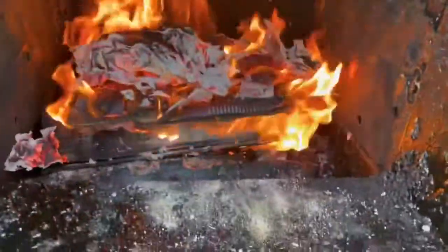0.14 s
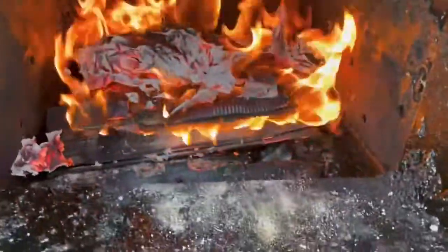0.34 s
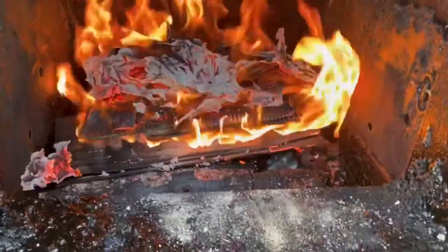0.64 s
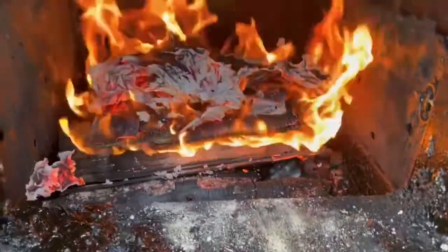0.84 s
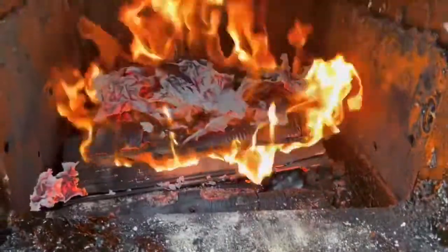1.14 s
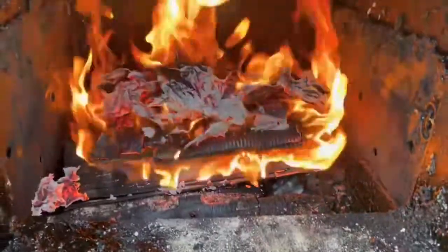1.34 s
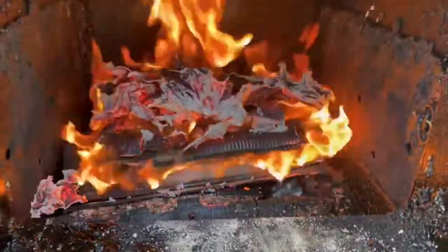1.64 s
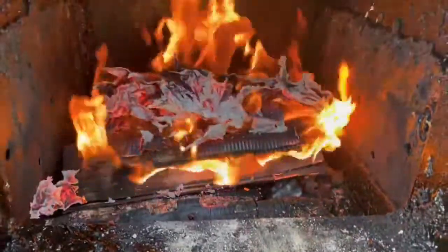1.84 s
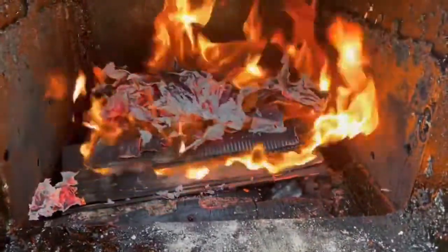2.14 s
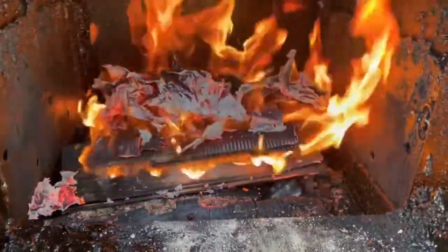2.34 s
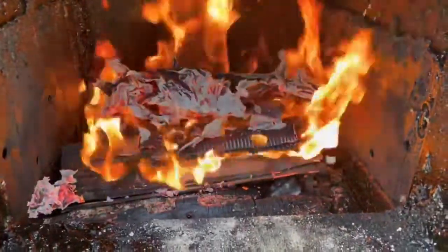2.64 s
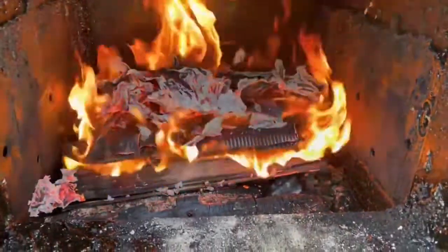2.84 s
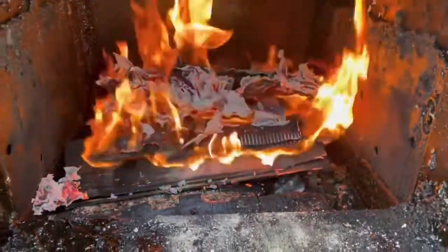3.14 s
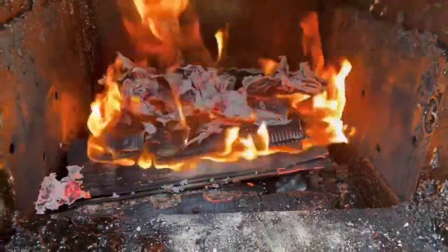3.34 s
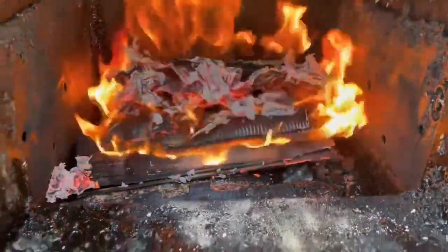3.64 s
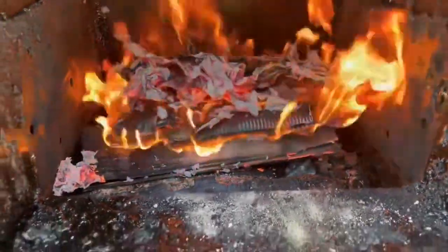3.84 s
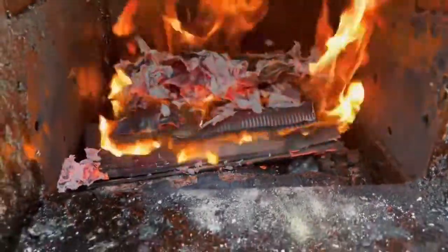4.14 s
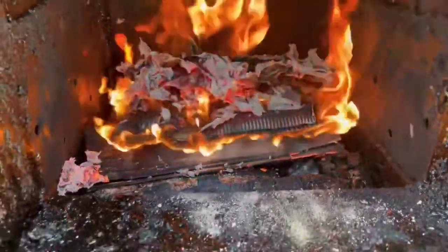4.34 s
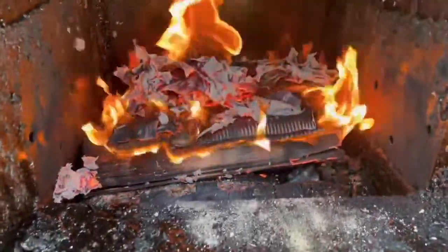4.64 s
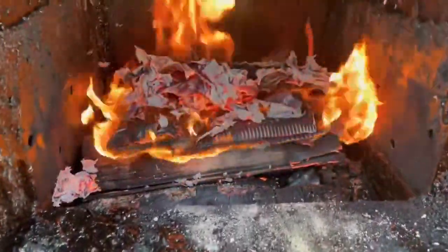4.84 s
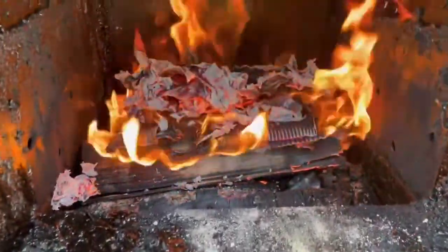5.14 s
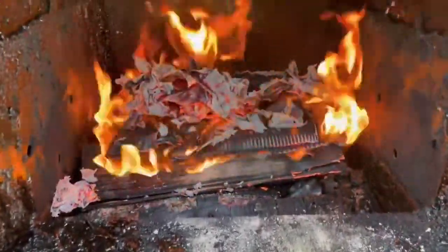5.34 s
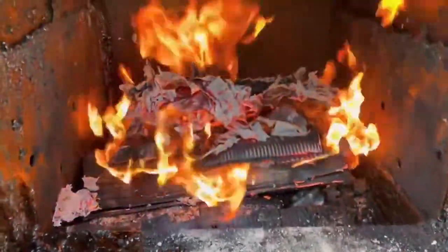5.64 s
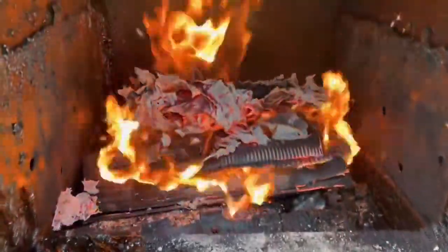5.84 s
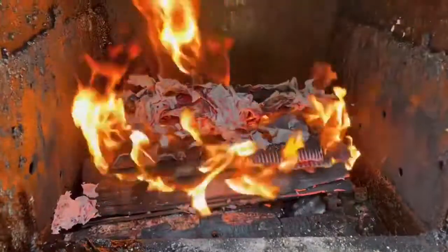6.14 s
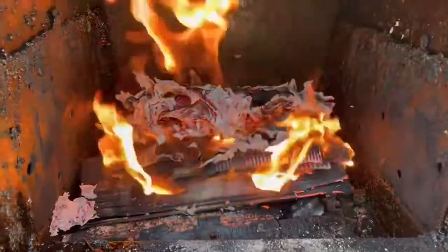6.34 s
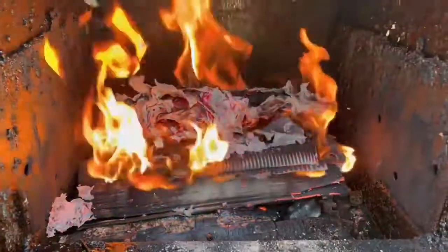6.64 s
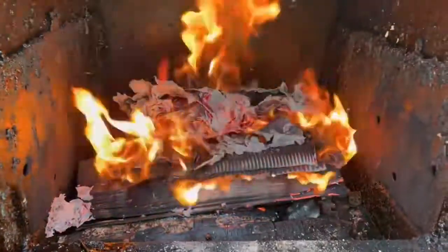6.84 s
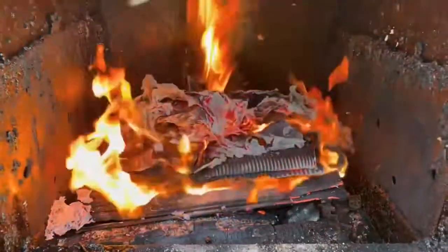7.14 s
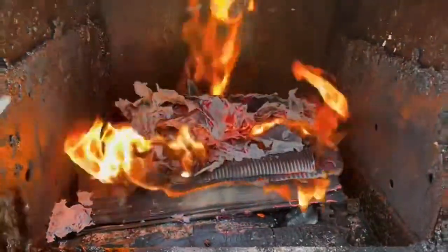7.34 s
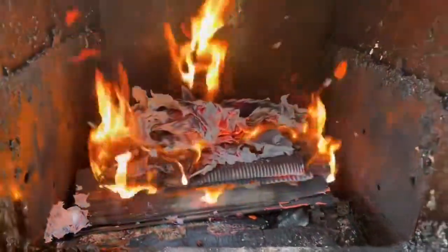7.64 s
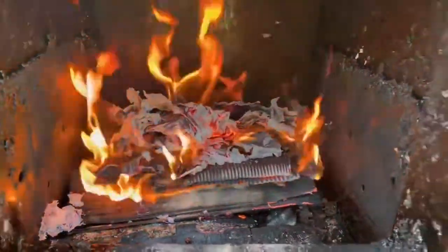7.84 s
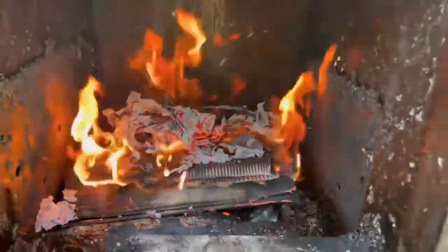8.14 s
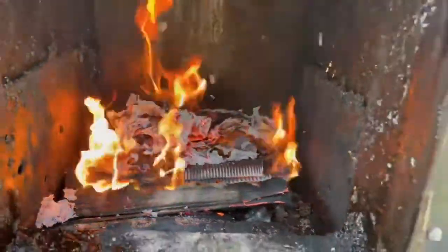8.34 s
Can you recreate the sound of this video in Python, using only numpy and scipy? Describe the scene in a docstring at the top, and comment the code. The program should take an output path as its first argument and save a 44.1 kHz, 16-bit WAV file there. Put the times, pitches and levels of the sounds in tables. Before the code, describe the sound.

A deep, steady furnace hum and low booming flames, with faint hiss, sparse dry ember ticks and cracks, and a small piece of char dropping near the end.

```python
"""Wood furnace fire

A blower motor hums as wavering sines; flames boom, roar and hiss as noise shaped by firebox air modes.
Embers tick and crack, a bit of char drops and tumbles (short decaying noise bursts), gas squeaks once;
a far cricket trills in tone pulses. Left and right differ in phase and level by frequency."""
import sys
import numpy as np
from scipy import signal
from scipy.fft import rfft, irfft, next_fast_len
from scipy.io import wavfile
from scipy.ndimage import uniform_filter1d, map_coordinates

SR = 44100
rng = np.random.default_rng(int(sys.argv[2]) if len(sys.argv) > 2 else 0)


def wav_record(signal):
    """Record a signal, one row per channel, as 16-bit PCM in the file named by sys.argv[1]."""
    frames = np.transpose(np.atleast_2d(signal))
    bounded = np.clip(frames, -1, 1)
    # unit amplitude maps onto the largest positive 16-bit level
    quanta = np.round(bounded * 32767).astype(np.int16)
    wavfile.write(sys.argv[1], SR, quanta)


N = 373968

# Left-right correlation of the noise: f/Hz, correlation/1
STEREO_ALIKE = [(60, .999), (220, .97), (330, .92), (900, .62), (1800, .35), (2700, .7), (3400, .45),
                (4500, .55), (6200, .15), (7400, .75), (7800, .99), (8800, .98), (9600, .6), (10300, .7),
                (10700, .99), (11800, .99), (12700, .5), (13500, .8), (14200, .99), (15200, .98),
                (15700, .75)]
# Stereo phase by frequency, left minus right: f/Hz, phase/rad
STEREO_PHASE = [(60, -.18), (220, -.12), (400, 0), (1200, .1), (1800, -1.2), (2300, -.1), (5000, -.4),
                (6400, 3.0), (8800, 3.2), (10400, 6.25), (12300, 6.35), (13400, 9.2), (15500, 9.5)]
# Stereo level by frequency, left minus right: f/Hz, level/dB
STEREO_LEAN = [(60, -1), (200, -1), (380, -3.5), (700, -2), (1900, -5), (3000, -2), (5000, -5),
               (6800, -0.5), (15000, 1)]
TOP_HZ = 15800

# Cricket bouts: start t/s, length/s, level before flutter/dB
TRILLS = [(.5, 1.9, -67), (3.4, 2.2, -63), (6.7, 2.2, -68)]
# Pitch at the foot of a pulse, before jitter: t/s, f/Hz
TRILL_FOOT = [(0, 8400), (1.5, 8560), (5.3, 8500), (8.48, 8450)]
CHIRP_START_S, CHIRP_PERIOD_S, CHIRP_WIDTH_S = .021, .06315, .0093
TRILL_ARCH_HZ, TRILL_JITTER_HZ = 170, 45
TRILL_SWELL_S, TRILL_FADE_S, TRILL_REST_DB = .6, .4, -79

# Motor tones: f/Hz, rms level before load and waver/dB
MOTOR_TONES = [(58.55, -25), (117.1, -61.5), (153, -65), (240, -53.5), (292.8, -68), (465, -65.5)]
# Level change of the hum, sagging near the end: t/s, level/dB
MOTOR_LOAD = [(0, 0), (1, -1), (7.9, -0.83), (8.4, -6.5), (8.48, -2.5)]

SQUEAK_S, SQUEAK_LONG_S = 6.795, .085
SQUEAK_DB, SQUEAK_HZ, SQUEAK_RISE_HZ = -66.5, 2540, 340

# Contacts of the falling char: t/s, level/dB, tilt/(dB/octave)
CONTACTS = [(7.7615, -47, -3), (7.818, -39, 4), (7.8223, -25.5, -1), (7.854, -42, -1), (7.864, -45, 1)]
# Bands of each contact: f/Hz, relative level/dB, t60/s, half-width/octave
CHAR_BANDS = [(1500, -5, 0.009, .14), (2050, -4, 0.009, .14), (3100, -6, 0.0075, .3), (4400, -7, 0.007, .2)]
# Floor thump under the hardest contact: f/Hz, peak level/dB, t60/s, half-width/octave
FLOOR_BANDS = [(260, -36, 0.022, .12), (375, -28, 0.022, 0.11), (485, -34, 0.028, .08)]
THUD_S, DROP_LEAN_DB = 7.8245, -2  # lean is left minus right
CRUMBS_S, CRUMBS_LONG_S = 7.827, .046
CRUMBS_DB, CRUMBS_LOW_HZ, CRUMBS_OCTAVES = -52, 1400, 2.1  # loudest level, lowest pitch, pitch range

# Louder ember ticks: t/s, main-band peak level/dB, top band over main/dB
TICKS = [(0.2151, -55, -11), (0.273, -39.5, -11), (0.295, -53, -14), (0.644, -40, -18),
         (0.7382, -51.5, -14), (0.7646, -50, -29), (0.8844, -52, -16), (0.9063, -51.5, -15),
         (0.953, -46, -1), (1.2405, -47, -13), (1.3515, -48, -21), (1.507, -40, -17), (1.8836, -48, -16),
         (2.3884, -44, -13), (2.442, -35.5, -10), (2.6339, -50, -12), (2.6956, -42, -14),
         (2.8323, -45, -15), (3.005, -41, -18), (3.281, -44, -5.5), (3.4073, -43, -20), (3.5416, -45, -8),
         (3.748, -47, -27), (3.8437, -50.5, -15), (3.872, -40, -18), (3.9072, -46.5, -15),
         (3.9345, -49, -14), (3.9566, -48, -28), (4.0751, -53, -13), (4.105, -39.5, -18), (4.2, -46, -15),
         (4.5504, -42, -10), (4.6598, -49.5, -12), (4.9079, -45.5, -8), (4.9807, -50, -25),
         (5.0574, -52, -14), (5.1903, -42, -12.5), (5.2096, -49, -14), (5.275, -48, 3),
         (5.4312, -45.5, -16), (5.449, -53, -14), (5.7001, -50.5, -4), (5.829, -45.5, -5),
         (5.871, -47, -15), (6.0438, -46.5, 3), (6.4464, -51, -7), (6.4806, -47, -21), (6.8, -51, -10),
         (7.515, -42, -17), (7.7049, -47, -16), (7.7513, -52, -14), (7.822, -45.5, -14), (7.9109, -50, -17),
         (8.0571, -52, -15), (8.1208, -43, -18.5), (8.2314, -54.5, 1), (8.382, -49, -20),
         (8.4168, -40.5, -23)]
# Char cracks: t/s, peak level/dB, f/Hz, t60/s, half-width/octave
CRACKS = [(.643, -52, 3500, .012, .4), (.7394, -52, 2700, .014, 0.17), (.945, -51, 3000, .012, .4),
          (1.402, -45, 955, 0.053, 0.32), (1.506, -50, 2300, .055, 0.11), (1.507, -49, 4300, .018, .25),
          (3.07, -49, 3000, .012, .5), (3.281, -46, 2860, .02, .3), (3.282, -47, 4700, .012, .45),
          (3.5403, -45, 3930, 0.014, 0.73), (3.908, -45, 5600, .012, .45), (3.908, -49, 3000, .012, 0.29),
          (4.107, -49, 2600, .016, 0.24), (4.3594, -54, 2700, .014, .2), (5.432, -52, 3200, .012, .3),
          (5.53, -45.5, 2720, .016, 0.25), (5.7374, -47.5, 5300, .012, .2), (6.4462, -38, 3040, 0.01, .16),
          (6.447, -44, 5200, .008, .5), (6.449, -50, 1500, 0.01, .4), (7.502, -44, 955, 0.068, 0.44),
          (7.512, -47, 2200, .02, .7), (7.7547, -50, 2500, 0.017, .4)]
# Tick bands: f/Hz, t60/s, half-width/octave
TICK_MAIN, TICK_TOP, TICK_BODY = (9000, .01, .6), (14800, .005, .2), (4500, .009, .6)
TICK_BODY_DB = -20.5  # relative to main band

# Firebox air modes, boom first: f/Hz, width before skirt exponent/Hz, relative density/(dB/Hz)
BOX_MODES = [(72.6, 11.55, -45), (110, 67, -67), (206.3, 15.2, -56.5), (245, 11.8, -63), (353.6, 33, -71),
             (395.3, 60, -72), (506, 27, -71.5), (548, 22, -70), (716, 76, -80), (846, 86, -79),
             (1028, 115, -84), (1198, 48, -85.5), (1590, 144, -90.5), (2160, 650, -99)]
# Roar spectrum before offset and rms scaling: f/Hz, relative density/(dB/Hz)
ROAR_SPECTRUM = [(22, -29), (36, -6.5), (50, 7), (100, -7), (180, -6), (280, -19.5), (620, -40),
                 (1400, -39), (2800, -45.5), (5000, -59)]
# Hiss spectrum before rms scaling: f/Hz, relative density/(dB/Hz)
HISS_SPECTRUM = [(1500, -14.5), (2800, -3.5), (4000, -1.5), (4800, 3.5), (7000, 4.5), (7700, 0),
                 (8400, -13), (9500, -5), (10500, -9), (11800, -11), (13300, -14), (14600, -8.5),
                 (16000, -9)]
# Hiss level before flutter: t/s, level/dB
GAS_LEVEL = [(0, -57.5), (.8, -58), (6.5, -61), (8.48, -59.5)]
BOOM_DB, BOOM_SWING_DB, ROAR_DB = -34, 1, -40.5
MODE_SKIRT, ROAR_OFFSET_DB = 1.289, -60.5


def amp(db):
    """Gain of a level in dB."""
    return 10 ** (np.asarray(db) / 20)


def unit(x):
    """Scale to rms 1."""
    return x / np.sqrt(np.mean(x ** 2) + 1e-20)


def along(points, hz):
    """Interpolate (f, value) points on a log axis."""
    f, v = np.transpose(points)
    return np.interp(np.log(hz + 1), np.log(f + 1), v)


def curves(rows):
    """Interpolate each column after time to one value per sample."""
    s, *cols = np.transpose(rows)
    return [np.interp(np.arange(N) / SR, s, c) for c in cols]


def wobble(rate_hz):
    """Smooth random curve, rate_hz knots per second."""
    knots = rng.standard_normal(int(N * rate_hz / SR) + 4)
    return map_coordinates(knots, [np.arange(N) * rate_hz / SR])


def sweep(hz):
    """Sine of a varying frequency, by phase integration."""
    return np.sin(2 * np.pi * np.cumsum(hz) / SR)


def filtered(x, response):
    """Apply a complex response of frequency to x."""
    m = next_fast_len(N + SR // 2)
    return irfft(rfft(x, m) * response(np.fft.rfftfreq(m, 1 / SR)), m)[..., :N]


def rush(gain, patchy_db):
    """Stereo noise of rms 1, random time-frequency patches, left-right correlation by frequency."""
    z = signal.stft(rng.standard_normal((2, N)), nperseg=512)[2]
    field = rng.standard_normal(z.shape[1:])
    field = uniform_filter1d(field, size=6, axis=0)
    field = uniform_filter1d(field, size=14, axis=1)
    pair = signal.istft(z * amp(patchy_db * unit(field)), nperseg=512)[1][:, :N]

    def mix(hz):
        # correlation = cos(2 * angle)
        angle = np.arccos(np.clip(along(STEREO_ALIKE, hz), -1, 1)) / 2
        return gain(hz) * np.array([np.cos(angle), np.sin(angle)])

    shared, own = filtered(pair, mix)
    return unit(np.array([shared + own, shared - own]))


def snaps(rows, ring, attack_s):
    """Decaying band-noise bursts plus a sine, stronger when narrow; rows: s, dB, Hz, t60 s, octaves."""
    out, t = np.zeros(N + SR), np.arange(SR // 14) / SR
    noise = rng.standard_normal((len(rows), len(t)))
    for (s, db, hz, t60_s, octaves), n in zip(rows, noise):
        edges_hz = np.clip(hz * 2 ** (np.array([-1, 1]) * max(octaves, .05)), 100, 20000)
        band = signal.butter(2, edges_hz / (SR / 2), "bandpass", output="sos")
        puff = unit(signal.sosfilt(band, n))
        tone = ring / octaves * np.sin(2 * np.pi * hz * t)
        burst = (puff + tone) * amp(-60 * t / t60_s) * (1 - np.exp(-t / attack_s))
        out[round(s * SR):][:len(t)] += amp(db) * burst / np.abs(burst).max()
    return out[:N]


def cricket():
    """Far cricket: bouts of soft one-tone pulses, pitch arching up in each."""
    t = np.arange(N) / SR
    cycle = ((t - CHIRP_START_S) / CHIRP_PERIOD_S + .5) % 1
    from_pulse_s = (cycle - .5) * CHIRP_PERIOD_S
    swell = np.exp(-(from_pulse_s / CHIRP_WIDTH_S) ** 2)
    hz = curves(TRILL_FOOT)[0] + TRILL_ARCH_HZ * swell + TRILL_JITTER_HZ * wobble(40)
    bouts = amp(TRILL_REST_DB)
    for s, long_s, db in TRILLS:
        ramp = np.minimum((t - s) / TRILL_SWELL_S, (s + long_s - t) / TRILL_FADE_S)
        bouts = bouts + amp(db) * np.clip(ramp, 0, 1)
    return bouts * amp(3.7 * wobble(12)) * swell * sweep(hz)


def motor():
    """Blower hum: sines with slight random level and phase waver."""
    t = np.arange(N) / SR
    tones = np.zeros(N)
    for hz, db in MOTOR_TONES:
        level = amp(db + .28 * wobble(2.82))
        waver_rad = .06 * hz / 58.5 * wobble(1.87)
        tones += level * np.sin(2 * np.pi * hz * t + waver_rad)
    return np.sqrt(2) * amp(curves(MOTOR_LOAD)[0]) * tones * np.ones((2, 1))


def box(x):
    """Steel walls: short decaying noise tail, independent left and right."""
    t = np.arange(SR // 6) / SR
    tail = rng.standard_normal((2, len(t))) * amp(-60 * t / .069)
    delayed = np.pad(x, ((0, 0), (90, 0)))  # samples
    return signal.fftconvolve(delayed, tail / np.linalg.norm(tail[0]), axes=1)[:, :N]


def squeak():
    """Gas jet: brief faint whistle gliding up, with random pitch and level flutter."""
    u = np.clip((np.arange(N) / SR - SQUEAK_S) / SQUEAK_LONG_S, 0, 1)
    hz = SQUEAK_HZ + SQUEAK_RISE_HZ * u ** 2.2 + 60 * wobble(150)
    envelope = np.sqrt(np.abs(np.sin(np.pi * u))) * (u > 0) * (u < 1)
    return amp(SQUEAK_DB + 3.5 * wobble(70)) * envelope * sweep(hz)


def drop(crumb_count=80):
    """Falling char: every contact excites the same bands; the hardest thumps the floor, sheds crumbs."""
    pivot_hz = CHAR_BANDS[1][0]
    hits = [(s, db + level_db + tilt_db * np.log2(hz / pivot_hz), hz, t60_s, octaves)
            for s, db, tilt_db in CONTACTS
            for hz, level_db, t60_s, octaves in CHAR_BANDS]
    thud = [(THUD_S, db, hz, t60_s, octaves) for hz, db, t60_s, octaves in FLOOR_BANDS]
    u = rng.random((crumb_count, 3))
    crumbs = np.c_[CRUMBS_S + CRUMBS_LONG_S * u[:, 0],
                   CRUMBS_DB - 8 * u[:, 1],
                   CRUMBS_LOW_HZ * 2 ** (CRUMBS_OCTAVES * u[:, 2]),
                   np.full((crumb_count, 2), [.012, .3])]
    out = snaps(hits, ring=.094, attack_s=.00029)
    out += snaps(thud, ring=.4, attack_s=.0018)
    return out + snaps(crumbs, ring=.1, attack_s=.0005)


def embers(faint_count=220):
    """Three-band ticks and ringing char cracks over a random scatter of fainter ticks."""
    u = rng.random((faint_count, 3))
    faint = np.c_[u[:, 0] * N / SR,
                  -61.5 - 3 * np.log(u[:, 1]).clip(-2.5),
                  2200 * 2 ** (2.6 * u[:, 2] ** .6),
                  np.full((faint_count, 2), [.007, .6])]
    bands = []
    for s, db, top_db in TICKS:
        bands.append((s, db, *TICK_MAIN))
        bands.append((s, db + top_db, *TICK_TOP))
        bands.append((s, db + TICK_BODY_DB, *TICK_BODY))
    ticks = snaps(bands, ring=.02, attack_s=.0007)
    cracks = snaps(CRACKS, ring=.26, attack_s=.00026)
    return ticks + cracks + snaps(faint, ring=.15, attack_s=.0004)


def mode(f, centre_hz, width_hz, db):
    """Gain of one air resonance, skirts set by the exponent."""
    resonance = f * width_hz / np.abs(centre_hz ** 2 - f ** 2 + 1j * f * width_hz)
    return amp(db) * resonance ** MODE_SKIRT


def roar_gain(f):
    """Power sum of the burning spectrum and the upper air modes."""
    burning = amp(along(ROAR_SPECTRUM, f) + ROAR_OFFSET_DB)
    return np.sqrt(burning ** 2 + sum(mode(f, *m) ** 2 for m in BOX_MODES[1:]))


def flames():
    """Turbulent burning: lowest box mode booms, the others colour the roar, escaping gas hisses."""
    boom = rush(lambda f: mode(f, *BOX_MODES[0]), patchy_db=.5)
    roar = rush(roar_gain, patchy_db=1.0)
    hiss = rush(lambda f: amp(along(HISS_SPECTRUM, f)), patchy_db=1.5)
    boom_db = BOOM_DB + BOOM_SWING_DB * wobble(1.595)
    roar_db = ROAR_DB + .69 * wobble(8) + .8 * wobble(2)
    hiss_db = curves(GAS_LEVEL)[0] + .3 * wobble(8.1)
    return amp(boom_db) * boom + amp(roar_db) * roar + amp(hiss_db) * hiss


def channels(hz):
    """Channel responses: half the stereo level and phase difference on each side."""
    half = amp(along(STEREO_LEAN, hz) / 2) * np.exp(.5j * along(STEREO_PHASE, hz))
    return np.array([half, 1 / half])


def scene():
    """Sum all sources and the wall tail of the sparks, then apply the channel responses."""
    char = drop() * amp([[DROP_LEAN_DB / 2], [-DROP_LEAN_DB / 2]])
    sparks = embers() + squeak() + char
    walls = amp(-11) * box(sparks)
    far = cricket() * amp([[1.2], [-1.2]])
    return filtered(far + motor() + walls + sparks + flames(), channels)


def record(dry):
    """Remove everything from the band limit up."""
    return filtered(dry, lambda hz: hz < TOP_HZ)


dry = scene()
out = record(dry)
wav_record(out)
```